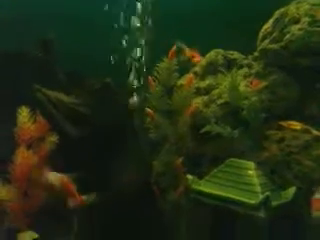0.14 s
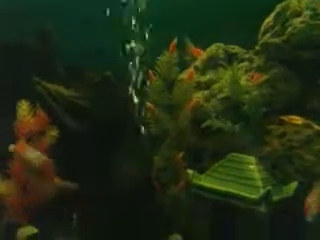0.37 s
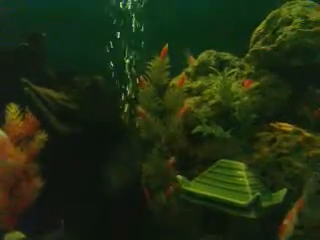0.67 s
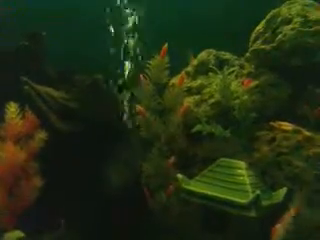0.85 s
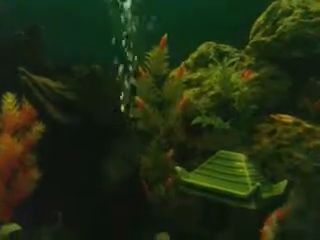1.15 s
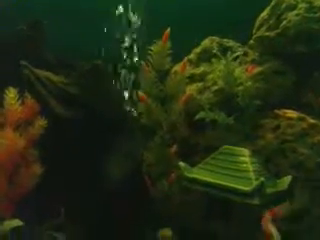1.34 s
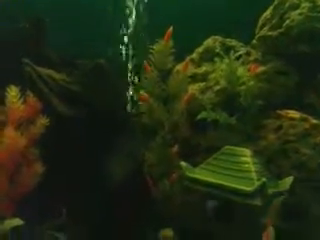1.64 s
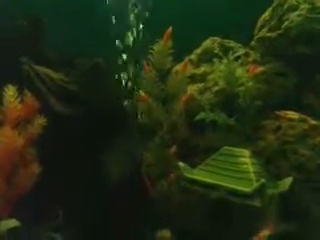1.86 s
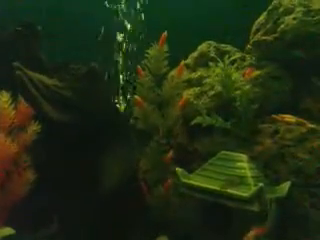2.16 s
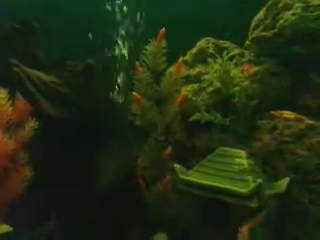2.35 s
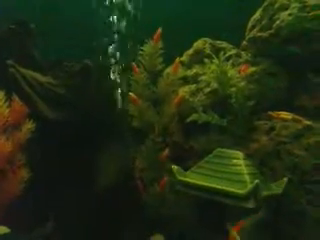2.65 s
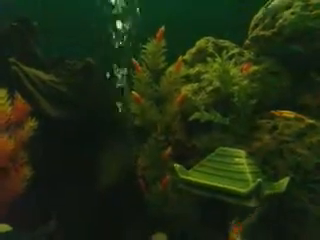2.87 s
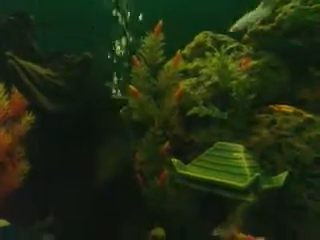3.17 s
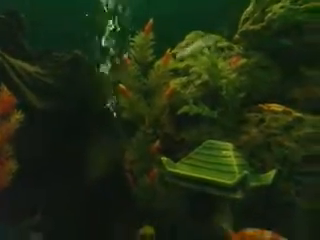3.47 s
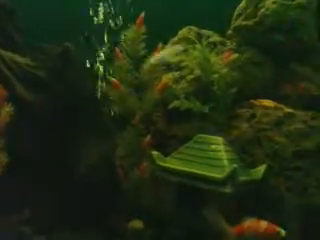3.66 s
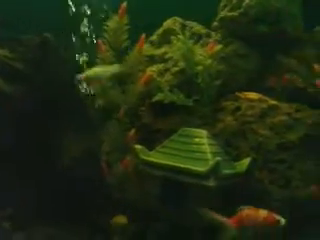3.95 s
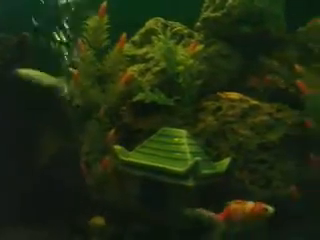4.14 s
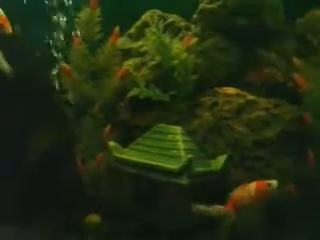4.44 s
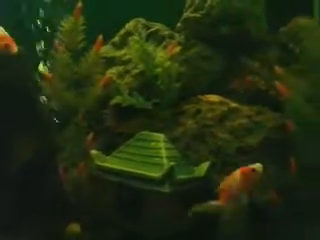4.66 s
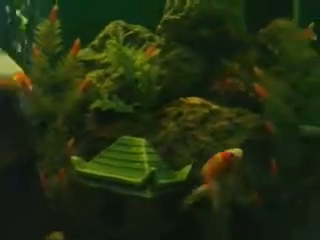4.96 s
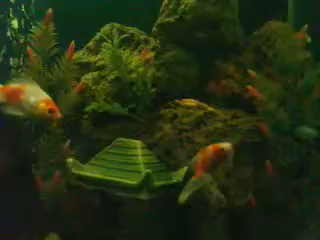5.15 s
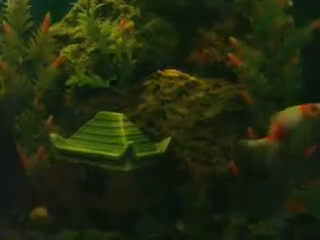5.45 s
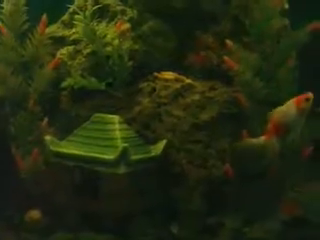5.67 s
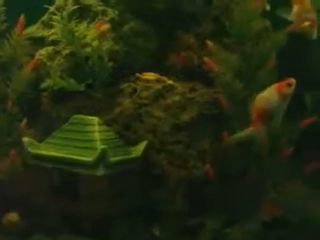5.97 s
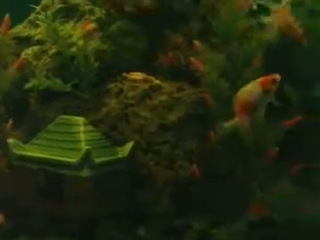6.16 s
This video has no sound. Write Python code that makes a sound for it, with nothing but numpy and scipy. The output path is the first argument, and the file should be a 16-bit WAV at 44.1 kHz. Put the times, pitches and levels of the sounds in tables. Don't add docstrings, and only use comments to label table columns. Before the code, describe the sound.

Close beside a home fish tank, an air pump buzzes without pause while aerated water churns, gurgles and fizzes. A brief handling rustle and sharp click come early, small metal parts jingle through the second quarter and middle, and loud, distorted knocks strike late. The dull narrow-band microphone cuts the treble, and the buzz changes colour slightly as the camera pans.

```python
import sys
import numpy as np
from scipy import signal
from scipy.fft import rfft, irfft, next_fast_len
from scipy.io import wavfile
from scipy.ndimage import uniform_filter1d, map_coordinates

SR = 44100
rng = np.random.default_rng(int(sys.argv[2]) if len(sys.argv) > 2 else 0)


def undo_db(level):
    steps = np.asarray(level, float) / 20
    return 10 ** steps


def log_audio(samples):
    frames = np.atleast_2d(samples).T
    limited = np.clip(frames, -1, 1)
    pcm = np.round(limited * 32767).astype(np.int16)
    wavfile.write(sys.argv[1], SR, pcm)


N = 278271

# rms level beside the pump in dB, rms level at the far end of the tank in dB.
PUMP_OVERTONES = [(-28.5, -28), (-36, -36.5), (-40, -40), (-41, -36), (-33.5, -37.5), (-42, -37.5),
                  (-26.5, -41.5), (-34.5, -34.5), (-25.5, -25.5), (-47.5, -43), (-34, -36), (-38, -35),
                  (-34, -31), (-32.5, -42.5), (-42.5, -50.5), (-55.5, -46.5), (-46, -44), (-31, -33.5),
                  (-38, -49), (-41.5, -49), (-52, -44.5), (-46, -33.5), (-44, -47), (-49, -37),
                  (-49.5, -44.5), (-46.5, -41), (-40.5, -44)]
# frequency in Hz, level in dB.
CHURN_SPECTRUM = [(15, -55), (25, -27.5), (189, -13), (295, -10), (1140, -13), (3130, -20.5), (3870, -36.5),
                  (6000, -110)]
# frequency in Hz, width in Hz, rms level in dB.
TANK_MODES = [
    (200.2, 58, -33.5),
    (670, 1200, -43.5),
]
# start in seconds, length in seconds, peak level in dB.
SHAKES = [
    [(1.42, .1, -32), (1.53, .07, -29.5), (1.65, .24, -21), (1.96, .06, -27), (2.04, 0.074, -29),
     (2.27, 0.1, -33), (2.42, 0.054, -32), (2.57, 0.062, -31.5), (2.68, 0.026, -21), (2.75, 0.054, -25.5),
     (2.85, 0.093, -30.5), (3.1, 0.13, -26), (3.23, 0.1, -30), (3.37, 0.077, -25.5), (3.46, 0.084, -28),
     (3.57, 0.065, -28), (3.65, .09, -34.5)],
    [(1.36, 0.067, -32), (1.47, 0.11, -27.5), (1.66, 0.05, -27.5), (1.75, 0.17, -23.5),
     (1.96, 0.092, -18.5), (2.12, 0.095, -32), (2.61, 0.02, -25), (2.66, 0.053, -23), (2.735, 0.023, -16),
     (2.78, 0.11, -26), (2.93, 0.027, -25.5), (3.03, 0.054, -36.5), (3.15, 0.067, -19),
     (3.225, 0.044, -15.5), (3.295, 0.08, -21), (3.4, .065, -20), (3.47, 0.047, -29)],
]
# frequency in Hz, drift in Hz per second.
METAL_MODES = [
    (2577, -8),
    (2993, -3),
]
# start in seconds, frequency in Hz, length in seconds, peak level in dB.
LARGE_BUBBLES = [(.93, 1735, .08, -21), (2.144, 1330, .062, -26), (3.26, 1710, .09, -29),
                 (4.16, 1020, .19, -28), (4.4, 1900, .17, -37), (.28, 1620, .025, -26),
                 (.315, 1700, .04, -28), (.53, 1400, .04, -29), (.6, 3180, .055, -37),
                 (.67, 2760, .07, -37), (.83, 2360, .08, -35.5), (1.05, 3250, .048, -37),
                 (1.12, 3280, .055, -37), (1.323, 1350, .005, -15), (4.0, 3130, .046, -35),
                 (4.33, 3120, .06, -33), (4.6, 3130, .082, -34), (4.96, 3110, .049, -34),
                 (5.03, 3090, .04, -32)]
# start in seconds, frequency in Hz, length in seconds, peak level in dB, rattle share from 0 to 1.
SHELL_KNOCKS = [(.2624, 2250, .0013, -3, .1), (.2643, 1230, .0017, -6.5, .15),
                (5.3983, 1000, .0042, .5, .25), (5.4033, 1000, .0056, -.5, .25),
                (5.4135, 1100, .004, -14, .3), (5.5742, 900, .0042, 4, .22), (5.579, 1250, .0055, -7, .9),
                (5.5812, 3900, .0035, -5.5, .8), (5.5855, 850, .0052, -4.5, .5),
                (5.592, 700, .012, -13, .5), (5.578, 105, .013, -17.5, 0)]
# frequency in Hz, gain in dB.
MICROPHONE = [(1, -55), (30, -5.5), (60, -1.5), (3300, -0.5), (3950, -8), (4400, -21), (4700, -43),
              (5000, -97)]
# time in seconds, way along the tank (0 beside the pump, 1 at the far end).
PAN_PATH = [
    (0, 0.01),
    (2.2, 0.12),
    (3.6, 0.2),
    (4.7, .9),
    (6.31, 1.08),
]

MAINS_HZ = 49.665
LOWEST_MULTIPLE = 4
WATER_DB, FIZZ_DB = -21, -46
CONTACTS_PER_S = 36


def unit(x):
    return x / np.sqrt(np.mean(x ** 2) + 1e-20)


def along(points, hz):
    f, v = np.transpose(points)
    return np.interp(np.log(hz + 1), np.log(f + 1), v)


def wobble(rate):
    knots = rng.standard_normal(int(N * rate / SR) + 4)
    return map_coordinates(knots, [np.arange(N) * rate / SR])


def filtered(x, response):
    m = next_fast_len(N + SR // 2)
    return irfft(rfft(x, m) * response(np.fft.rfftfreq(m, 1 / SR)), m)[:N]


def resonance(hz, width_hz):
    return lambda f: 1j * f * width_hz / (hz * hz - f * f + 1j * f * width_hz)


def resonant_band(noise, hz, width_hz):
    return unit(filtered(noise, lambda f: resonance(hz, width_hz)(f) ** 2))


def add(track, s, sound):
    part = track[round(s * SR):][:len(sound)]
    part += sound[:len(part)]


def microphone_hiss():
    return undo_db(-56.5) * resonant_band(rng.standard_normal(N), 3700, 900)


def grip_rustle():
    centre_s, length_s = 0.23, 0.17
    shape = np.exp(-((np.arange(N) / SR - centre_s) / length_s) ** 4)
    return undo_db(-28.5) * shape * resonant_band(rng.standard_normal(N), 1500, 340)


def knocks():
    rise_s, stop_s = .0005, .0008
    pitch_sag = .35
    out = np.zeros(N)
    rattle = unit(filtered(rng.standard_normal(N), resonance(1750, 2200)))
    for s, hz, length, db, share in SHELL_KNOCKS:
        t = np.arange(round((length + .004) * SR)) / SR
        shape = (1 - np.exp(-t / rise_s)) * np.exp(-np.maximum(t - length, 0) / stop_s)
        phase = 2 * np.pi * hz * (1 - pitch_sag * t / (2 * length)) * t
        rough = share * rattle[round(s * SR):][:len(t)]
        add(out, s, undo_db(db) * shape * (np.sin(phase) + rough))
    return out


def shake_power(shakes):
    gap_share = .3
    power = np.zeros(N)
    for s, length, db in shakes:
        u = np.linspace(-2, 2, round(2 * length * SR))
        contacts = max(round(length * CONTACTS_PER_S), 1)
        beads = np.cos(np.pi / 2 * contacts * (u + 1)) ** 4 * (np.abs(u) < 1)
        shape = np.exp(-np.abs(u) ** 6)
        add(power, s - length / 2, undo_db(2 * (db + gap_share * db * beads)) * shape)
    return power


def jingle():
    out, t = np.zeros(N), np.arange(N) / SR
    for shakes, (hz, drift) in zip(SHAKES, METAL_MODES):
        power = shake_power(shakes)
        phase = 2 * np.pi * (hz + drift * t / 2) * t + .9 * wobble(55)
        ticks = rng.standard_normal(N) * undo_db(2.5 * wobble(70))
        rattle = resonant_band(ticks, 2800, 600)
        lingering = np.abs(uniform_filter1d(power, size=4000))
        contact_scatter = undo_db(1.5 * wobble(2 * CONTACTS_PER_S))
        ring = np.sqrt(power + undo_db(-25.5) * lingering) * contact_scatter
        out += ring * np.sin(phase) + np.sqrt(lingering) * undo_db(-12.5) * rattle
    return out


def large_bubbles():
    out, waver = np.zeros(N), .9 * wobble(65)
    for s, hz, length, db in LARGE_BUBBLES:
        t = np.arange(round(length * SR)) / SR
        phase = 2 * np.pi * hz * t + waver[round(s * SR):][:len(t)]
        add(out, s, undo_db(db) * np.sin(np.pi * t / length) * np.sin(phase))
    return out


def bubbles(count, hz, scatter, cycles, size_db):
    draw, t = rng.random((count, 3)), np.arange(700) / SR
    pitch = hz * np.exp(scatter * rng.standard_normal((count, 1)))
    pitch = np.clip(pitch, 150, 4000)
    age = t * pitch / cycles
    ring = np.sin(2 * np.pi * pitch * t * (1 + 0.14 * age))
    ring *= np.exp(-3 * age) * (1 - np.exp(-12 * age))
    ring *= np.cos(np.pi / 2 * t / t[-1])
    ring *= undo_db(-size_db * np.log(draw[:, 1:2] + .02))
    at = (draw[:, :1] * N).astype(int) + np.arange(len(t))
    return unit(np.bincount(at.ravel(), ring.ravel(), N + len(t))[:N])


def churning():
    z = signal.stft(rng.standard_normal(N), nperseg=512)[2]
    field = uniform_filter1d(rng.standard_normal(z.shape), 5, 0)
    field = uniform_filter1d(field, 8, 1)
    patchy = signal.istft(z * undo_db(1.9 * unit(field)), nperseg=512)[1][:N]
    churn = unit(filtered(patchy, lambda f: undo_db(along(CHURN_SPECTRUM, f))))
    stroke = 2 * np.pi * MAINS_HZ * np.arange(N) / SR
    return churn * undo_db(1.5 * np.sin(2 * stroke + 1.9))


def tank_ringing():
    return sum(undo_db(db) * resonant_band(rng.standard_normal(N), hz, width)
               for hz, width, db in TANK_MODES)


def water():
    body_db = WATER_DB + .2 * wobble(4.1)
    fizz_db = FIZZ_DB + .8 * wobble(3.3)
    churn_db = body_db - 4.5 + 0.69 * wobble(25)
    gurgle = bubbles(count=2500, hz=914, scatter=.45, cycles=5.3, size_db=2.0)
    gurgle = filtered(gurgle, lambda f: 1 / (1 + (f / 2200) ** 8))
    fizz = bubbles(count=5000, hz=2900, scatter=.2, cycles=4, size_db=2.5)
    stream = undo_db(churn_db) * churning() + undo_db(body_db - 8) * gurgle + undo_db(fizz_db + 2.5) * fizz
    return stream + tank_ringing()


def pump():
    t, out = np.arange(N) / SR, np.zeros(N)
    way = np.interp(t, *np.transpose(PAN_PATH))
    turn = 2 * np.pi * MAINS_HZ * t + 0.022 * wobble(.6)
    for k, (near_db, far_db) in enumerate(PUMP_OVERTONES, LOWEST_MULTIPLE):
        level_db = near_db + (far_db - near_db) * way + 0.47 * wobble(17)
        out += np.sqrt(2) * undo_db(level_db) * np.sin(k * turn + k * k)
    return out


def scene():
    background = microphone_hiss() + grip_rustle() + knocks()
    return (background + jingle() + large_bubbles() + water() + pump())[None]


def roll_off(x):
    return signal.sosfilt(signal.butter(12, 16000, fs=SR, output="sos"), x)


def record(dry):
    x = filtered(dry[0], lambda f: undo_db(along(MICROPHONE, f)))
    x = x / (1 + np.abs(x / .72) ** 40) ** (1 / 40)
    return roll_off(x[None])


dry = scene()
out = record(dry)
log_audio(out)
```